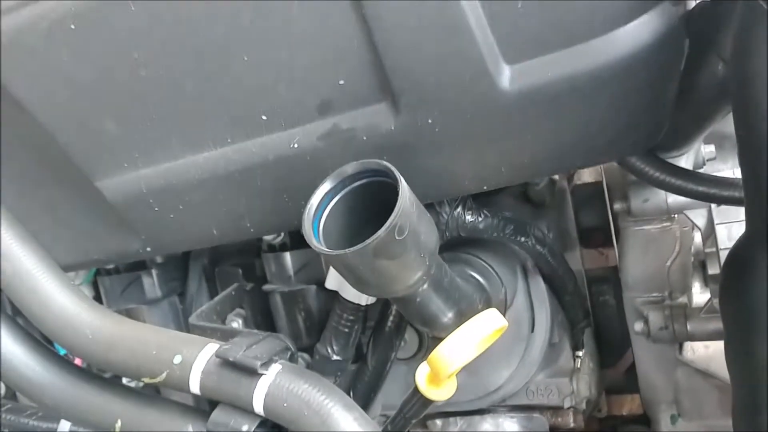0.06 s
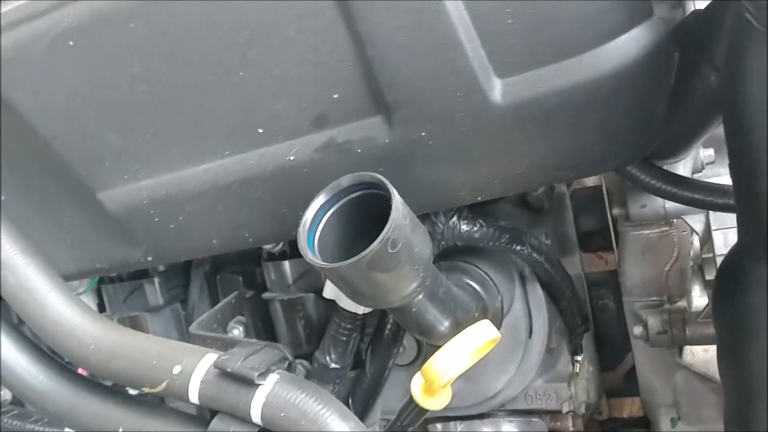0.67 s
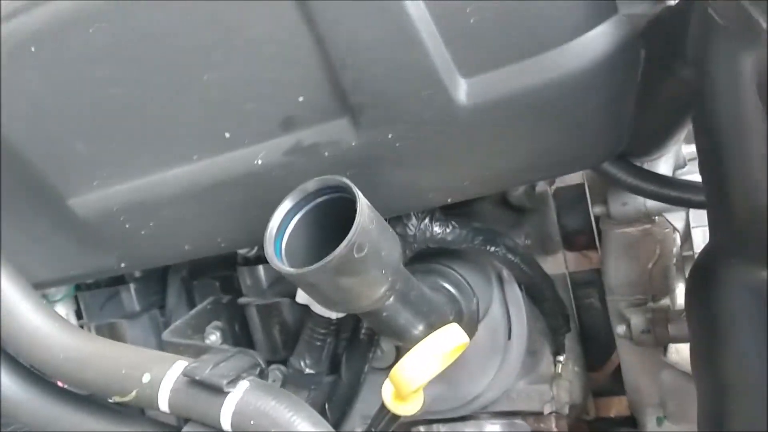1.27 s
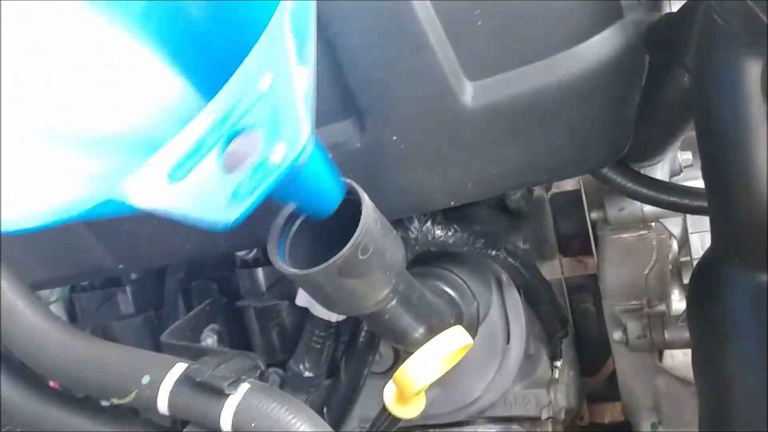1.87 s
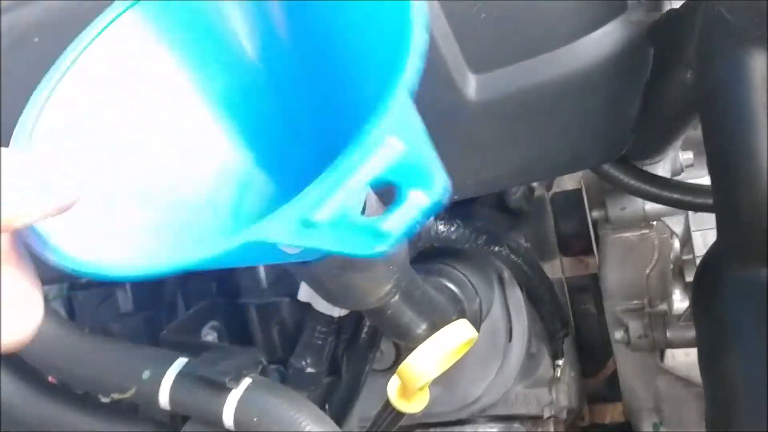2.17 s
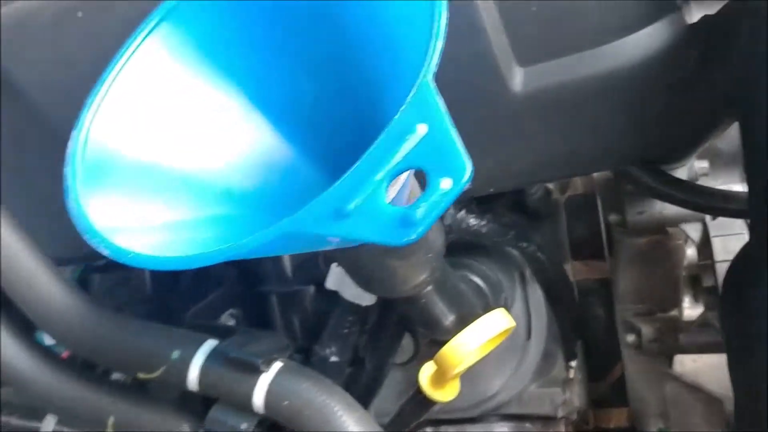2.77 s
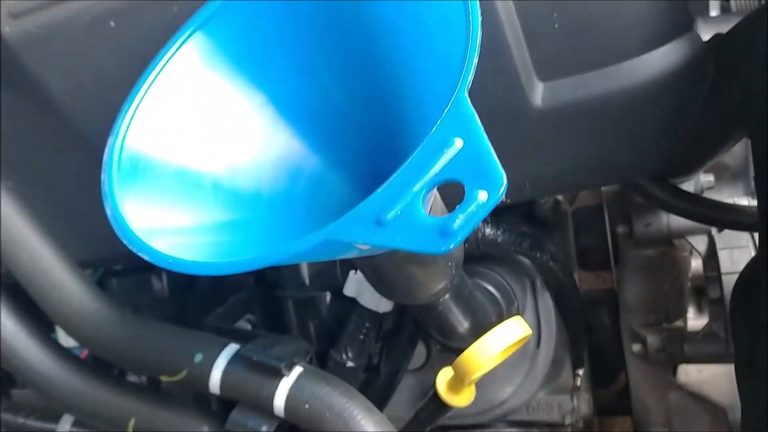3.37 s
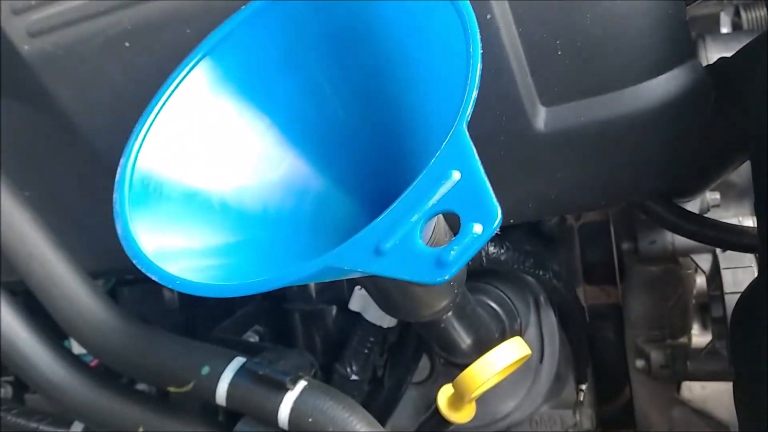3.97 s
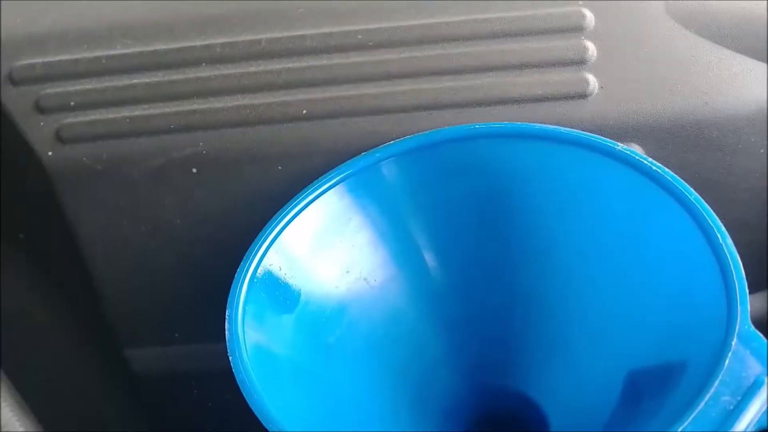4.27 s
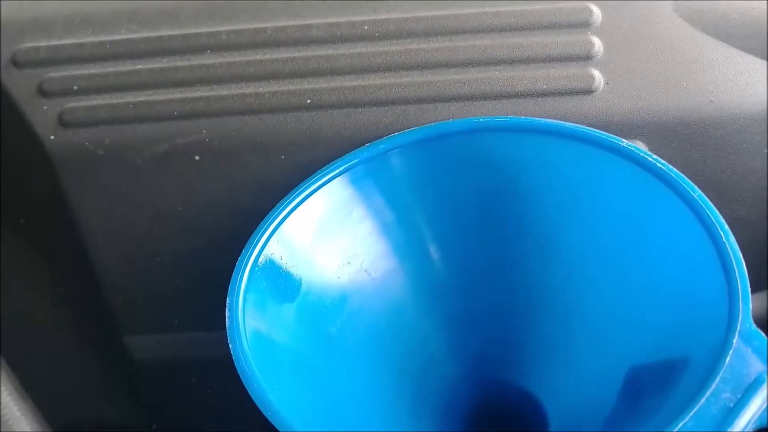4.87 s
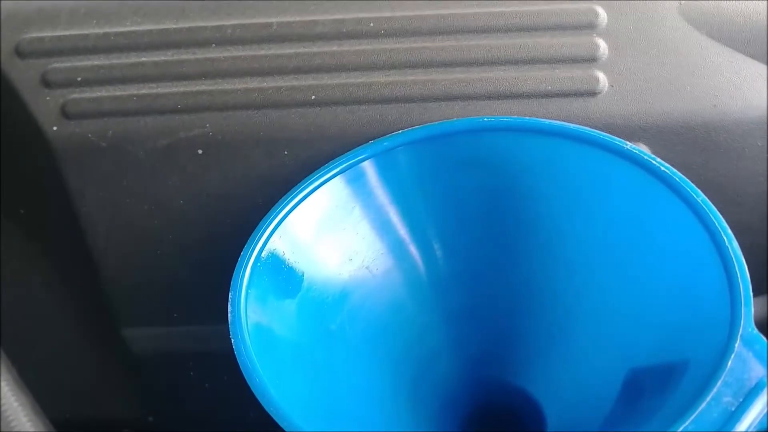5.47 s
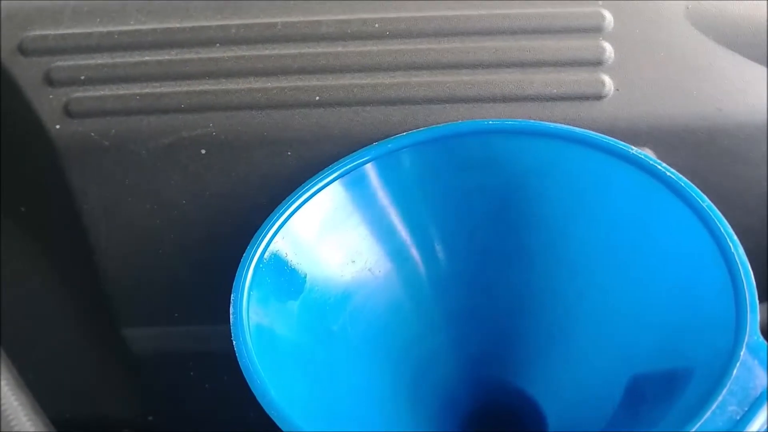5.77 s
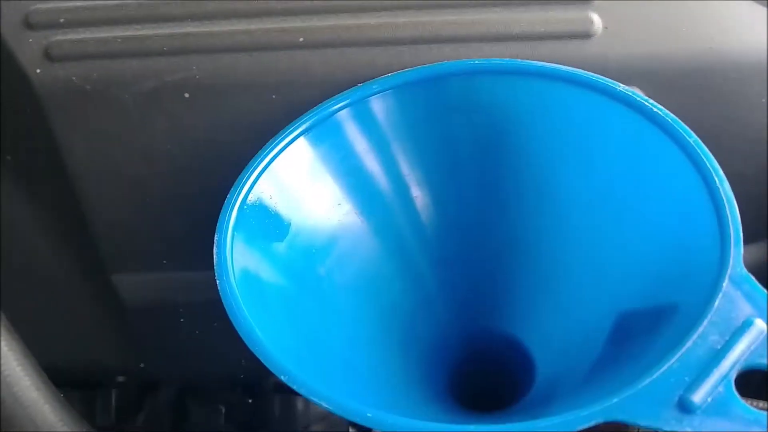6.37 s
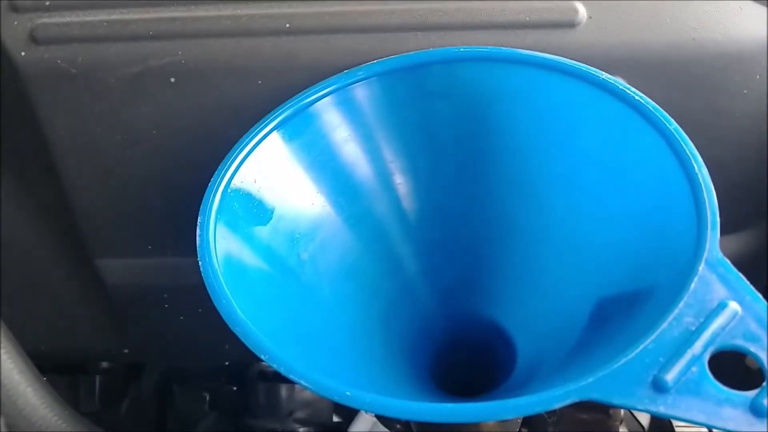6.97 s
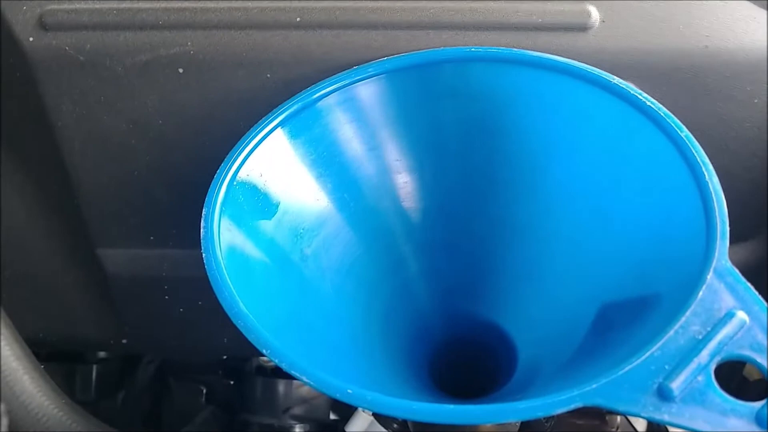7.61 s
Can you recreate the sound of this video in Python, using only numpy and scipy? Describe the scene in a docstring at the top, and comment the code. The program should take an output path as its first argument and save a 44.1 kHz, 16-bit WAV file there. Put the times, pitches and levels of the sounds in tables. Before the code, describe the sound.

A small plastic filler cap clacks and ticks in an open engine bay. A plastic funnel then knocks hollowly and scrapes into the filler neck. After some low hand bumps and a brief dropout, a plastic bottle rubs and creaks quietly, and its liquid gives a few soft glugs. The microphone is hand-held and close, with faint garage hiss underneath.

```python
"""Over faint hiss and hand rumble, a plastic filler cap clacks and ticks in an open engine bay in a garage.
A plastic funnel then knocks and scrapes into the filler neck. After a brief mute at an edit cut, a
plastic bottle rubs and creaks, and its liquid glugs softly. The knocks are damped modes excited by
impact, the scrapes and rubs are stick-slip friction, and the glugs are resonating air pockets.
A hand-held phone close by widens the stereo."""
import sys
import numpy as np
from scipy import signal
from scipy.fft import rfft, irfft, next_fast_len
from scipy.io import wavfile
from scipy.ndimage import uniform_filter1d

SR = 44100
rng = np.random.default_rng(int(sys.argv[2]) if len(sys.argv) > 2 else 0)


def wrap_up_sound(samples):
    """Save the sound to the file named by the first command line argument, as 16-bit audio."""
    columns = np.atleast_2d(samples).T
    # keep every value between -1 and 1, then stretch to whole-number steps
    tamed = np.clip(columns, -1, 1)
    steps = np.round(tamed * 32767).astype(np.int16)
    wavfile.write(sys.argv[1], SR, steps)


N = 341334
TIME = np.arange(N) / SR
# thump, knock, snap and tick registers of an impact: (low edge [Hz], high edge [Hz])
IMPACT_BANDS = [(100, 650), (650, 1800), (1800, 6000), (6000, 16000)]


def undb(db):
    """Decibels to amplitude ratio."""
    return 10 ** (np.asarray(db) / 20)


def unit(x):
    """Normalisation to rms 1."""
    return x / np.sqrt(np.mean(x ** 2))


def curve(table):
    """Gain envelope interpolated through (time [s], level [dB]) points."""
    times, db = np.transpose(table)
    return undb(np.interp(TIME, times, db))


def band(x, lo_hz, hi_hz, order=2):
    """Causal Butterworth band-pass."""
    sos = signal.butter(order, [lo_hz, min(hi_hz, SR / 2 - 1)], "band", fs=SR, output="sos")
    return signal.sosfilt(sos, x)


def add(out, s, sound):
    """Superposition of a short sound at s seconds."""
    i = int(s * SR)
    out[:, i:i + sound.shape[-1]] += sound[..., :N - i]


def coloured(pair, colour):
    """Spectral shaping of two unrelated signals as mid and side; returns left and right at rms 1."""
    hz, *dbs = np.transpose(colour)
    size = next_fast_len(N)
    log_hz = np.log(np.arange(size // 2 + 1) * SR / size + 1)
    gains = [undb(np.interp(log_hz, np.log(hz), db)) for db in dbs]
    mid, side = (irfft(rfft(x, size) * gain, size)[:N] for x, gain in zip(pair, gains))
    return unit(np.array([mid + side, mid - side]))


def wander(rate_hz):
    """Smooth random modulation at rms 1."""
    step = int(SR / rate_hz)
    held = np.repeat(rng.standard_normal(N // step + 1), step)
    return unit(uniform_filter1d(held, step)[:N])


def gestures(rows, attack_s, release_s, level_column=2):
    """Power summation of envelopes: each row swells, holds its level for its duration and dies away."""
    power = np.zeros(N)
    for row in rows:
        early, late = np.maximum(row[0] - TIME, 0), np.maximum(TIME - row[0] - row[1], 0)
        fade = np.exp(-np.minimum(2 * (early / attack_s + late / release_s), 20))
        power += undb(row[level_column]) ** 2 * fade
    return np.sqrt(power)


def slips(rate_hz, spread_db, smooth):
    """Stick-slip: tiny random releases of uneven size over a smooth friction noise."""
    releases = rng.random(N) < rate_hz / SR
    sizes = releases * undb(spread_db * np.minimum(rng.exponential(size=N), 4))
    return unit(unit(sizes * rng.standard_normal((2, N))) + smooth * rng.standard_normal((2, N)))


def contacts(hits, skirt_db, rebound_s, rebound_db, rebound_soft):
    """Contact spectra: each impact and its softer rebound as (time [s], level in each register [dB])."""
    centre_hz, out = np.sqrt(np.prod(IMPACT_BANDS, axis=1)), []
    for s, db, lo_hz, hi_hz in hits:
        for onset, level, top_hz in (s, db, hi_hz), (s + rebound_s, db + rebound_db, hi_hz * rebound_soft):
            # an edge touch moves no lows, a soft contact no highs; both fall by skirt_db an octave
            rolloff = (1 + (lo_hz / centre_hz) ** 2) * (1 + (centre_hz / top_hz) ** 2)
            shape_db = -skirt_db / 2 * np.log2(rolloff)
            out.append((onset, *(level + shape_db - shape_db.max())))
    return out


def impacts(hits, modes, punch, crack_db, crack_t60, crack_hz, bay_db, bay_t60, lag_ms, scatter_rad):
    """Modal response: each impact cracks, rings damped modes and scatters round the engine bay."""
    out, t = np.zeros((2, N)), np.arange(SR // 9) / SR
    hz, db, t60 = np.transpose(modes)[:, :, None]
    t60 = np.minimum(t60, 130 / hz)  # plastic is lossy: 130 cycles at most
    # sound reaches the right port a little later, and each mode by a slightly different path
    age = np.maximum(t - np.array([0, lag_ms / 1000])[:, None, None], 0)
    decay = undb(db - 60 * age / t60) * (age > 0)
    # the first cycles are the strongest, then the hand damps the part
    contact = (1 - np.exp(-t / .0002)) * (1 + punch * np.exp(-(t / .003) ** 2))
    for s, *levels_db in hits:
        detune = 1 + .012 * rng.standard_normal(hz.shape)
        phase = scatter_rad * rng.standard_normal((2, len(hz), 1))
        # firm blows drive the main modes; light touches land anywhere and favour other modes each time
        spot_db = np.interp(max(levels_db), [-38, -26], [6, 1]) * rng.standard_normal(hz.shape)
        ring = (undb(spot_db) * decay * np.sin(2 * np.pi * hz * detune * age + phase)).sum(1)
        crack = undb(crack_db - 60 * t / crack_t60) * band(rng.standard_normal((2, len(t))), 100, crack_hz)
        diffuse = unit(band(rng.standard_normal((2, len(t))), 160, 1400, order=1))
        bay = undb(bay_db - 60 * t / bay_t60) * diffuse
        for level, (lo_hz, hi_hz) in zip(levels_db, IMPACT_BANDS):
            part = band(contact * (ring + crack + bay), lo_hz, hi_hz, order=3)
            attack_rms = np.sqrt(np.mean(part[:, :SR // 90] ** 2))
            add(out, s, undb(level) * part / attack_rms)
    return out


def air():
    """Noise floor: quiet garage air and microphone self-noise with two narrow bright bands."""
    # spectrum of the floor: (frequency [Hz], mid [dB], side [dB])
    spectrum = [(25, -21, -9), (58.6, -1, -15), (126, 0.5, -11), (259, -11, -16.5), (496, -17.5, -22),
                (1000, -23.5, -25), (1630, -27, -26), (2130, -34, -32.5), (4000, -33, -32.5),
                (6100, -32, -33), (7800, -31, -31.5), (10600, -30.5, -30.5), (14900, -33.5, -36)]
    # its slow drift: (time [s], level [dB])
    drift = [(0, -55.5), (.5, -51), (1.1, -56), (1.5, -53), (2.6, -53.5), (3.1, -50), (4, -52),
             (5.65, -49.5), (7.74, -49)]
    sheen = undb(-19.5) * unit(band(rng.standard_normal((2, N)), 7350, 7900))
    top = undb(-17) * unit(band(rng.standard_normal((2, N)), 14500, 15400, order=1))
    return curve(drift) * (coloured(rng.standard_normal((2, N)), spectrum) + sheen + top)


def garage(x):
    """Reverberation: a faint, dull exponential tail that starts with the first wall reflection."""
    t = np.arange(SR // 2) / SR
    tail = band(rng.standard_normal((2, len(t))), 120, 1500) * undb(-60 * t / .4) * (t > .012)
    tail /= np.sqrt(np.sum(tail ** 2) / 2)
    return undb(-35.5) * signal.fftconvolve(x, tail, axes=1)[:, :N]


def handling():
    """Structure-borne sound: the hand rumbles and bumps on the phone, in antiphase at the two ports."""
    # shifts of grip: (start [s], duration [s], relative level [dB])
    shifts = [(.26, .3, -53), (.62, .3, -42.5), (1.85, .55, -58), (2.46, 0.074, -45), (2.78, 0.26, -44),
              (3.36, 0.048, -51), (3.53, 0.45, -45.5)]
    # soft bumps of the hand: (time [s], relative level [dB], frequency [Hz])
    bumps = [(3.574, -17.5, 116), (3.608, -30, 84), (3.737, -16.5, 116), (3.767, -17.5, 135),
             (3.769, -27.5, 260), (3.783, -17, 84.4), (3.927, -21, 105)]
    out, t = np.zeros((2, N)), np.arange(SR // 5) / SR
    grip = undb(-65) + gestures(shifts, attack_s=.025, release_s=.027)
    flutter = undb(4.8 * wander(25))
    out += undb(-1) * grip * flutter * unit(band(rng.standard_normal(N), 45, 135, order=3))
    for s, db, hz in bumps:
        add(out, s, undb(db - 60 * t / .066) * np.sin(2 * np.pi * hz * t) * (1 - np.exp(-t / .0014)))
    return out * np.array([[1.15], [-.65]])


def glugs():
    """Bubble resonance: big air pockets ring low inside the bottle, each with a little splash."""
    # air pockets in the liquid: (time [s], relative level [dB], settled pitch [Hz], t60 [s])
    pockets = [(6.997, -42, 251, 0.08), (7.031, -37, 266, 0.077), (7.074, -43, 245, 0.13),
               (7.12, -42, 325, 0.11), (7.139, -41, 230, 0.11), (7.193, -31, 223, 0.092),
               (7.225, -41, 215.5, 0.19), (7.344, -45, 234, 0.13), (7.377, -49, 122, 0.13)]
    out, t = np.zeros((2, N)), np.arange(SR // 3) / SR
    for s, db, hz, t60 in pockets:
        pitch = hz * (1 + .21 * np.exp(-t / .002))  # the pocket sinks in pitch as it swells
        splash = undb(-14.5) * unit(band(rng.standard_normal((2, len(t))), 300, 890, order=1))
        pocket = np.sin(2 * np.pi * np.cumsum(pitch) / SR) * undb([[4], [7]])
        add(out, s, (pocket + splash) * undb(db - 60 * t / t60) * (1 - np.exp(-t / .0013)))
    return out


def bottle_rubs():
    """Friction through resonators: skin catches and hisses on the bottle, coloured by its air and walls."""
    # strokes of the hands: (start [s], duration [s], relative rub level [dB], relative hiss level [dB])
    strokes = [(4.18, 0.015, -49.5, -73), (4.355, 0.029, -46.5, -58), (4.45, 0.053, -37, -52.5),
               (4.63, .03, -45, -50.5), (4.78, 0.03, -45, -48), (4.85, 0.043, -49.5, -52.5),
               (4.95, 0.095, -47, -61.5), (5.095, .13, -35, -53.5), (5.32, .19, -48, -82),
               (5.80, 0.079, -42, -56.5), (5.945, 0.09, -41, -53), (6.1, 0.73, -51, -65.5),
               (6.375, 0.034, -52, -63), (6.53, 0.075, -40.5, -56), (6.95, 0.28, -50.5, -65.5),
               (7.675, .06, -52, -77)]
    # spectrum of skin on plastic: (frequency [Hz], mid [dB], side [dB])
    spectrum = [(50, -18, -17.5), (152, 5.5, -9.5), (331, -2, -5.5), (545, -5, -11), (824, -7, -7.5),
                (1320, -11.5, -13), (2040, -17, -14.5), (3260, -23, -29), (3960, -24, -22),
                (5400, -23.5, -25.5), (7580, -31.5, -28), (15000, -36, -35.5)]
    # air and wall resonances: (frequency [Hz], bandwidth [Hz], gain [dB])
    resonances = [(382, 166, -0.5), (730, 70, -2.5), (1000, 90, -16), (2920, 640, 2)]
    # the rubbing moves from the right to the middle: (time [s], left minus right [dB])
    pan = [(5.5, -6), (5.8, 0)]
    attack_s, release_s = .041, .039
    friction = coloured(slips(rate_hz=1500, spread_db=-.5, smooth=1), spectrum) * undb(1.33 * wander(70))
    resonant = sum(undb(db) * band(friction, hz - width / 2, hz + width / 2, order=1)
                   for hz, width, db in resonances)
    balance = curve(pan) ** np.array([[.5], [-.5]])
    rubbing = gestures(strokes, attack_s, release_s) * unit(friction + resonant) * balance
    fine_slips = unit(band(slips(rate_hz=5800, spread_db=6, smooth=1), 4000, 16000, order=1))
    hiss = gestures(strokes, attack_s, release_s, level_column=3) * fine_slips
    return undb(-.5) * rubbing + undb(3.5) * hiss


def bottle_creaks():
    """Impulsive excitation: the bottle's wall gives in small steps that ring its modes."""
    # steps of the wall: (time [s], relative level [dB], low corner [Hz], high corner [Hz])
    steps = [(4.245, -47, 110, 860), (4.292, -47.5, 100, 1210), (5.077, -31.5, 100.7, 714),
             (5.792, -36.5, 100.4, 280), (5.84, -35.5, 100, 563), (5.928, -34.5, 100, 1490),
             (5.984, -34.5, 560, 700), (6.002, -31.5, 100, 130), (6.509, -39.5, 100, 2390),
             (6.556, -35.5, 430, 470), (6.5855, -37, 221, 14100), (7.6503, -34, 100, 2000)]
    # modes of the bottle: (frequency [Hz], level [dB], t60 before the loss limit [s])
    modes = [(190, -12.5, 0.35), (279, -2.5, 0.16), (465.3, -8, 0.22), (560, -10, 0.043), (765, -2, 0.05),
             (941, 4.5, 0.089), (1307, -16, 0.097), (2760, -23, 0.019), (3100, -28, 0.0062),
             (5240, -5.5, 0.0055), (7700, -7, 0.022)]
    hits = contacts(steps, skirt_db=6, rebound_s=.012, rebound_db=-5, rebound_soft=.083)
    return undb(-1) * impacts(hits, modes, punch=.29, crack_db=6, crack_t60=.03, crack_hz=11700,
                              bay_db=5.5, bay_t60=.048, lag_ms=.052, scatter_rad=.95)


def scrapes():
    """Stick-slip friction: plastic edges chatter over each other between the knocks."""
    # slides of plastic on plastic: (start [s], duration [s], relative level [dB])
    slides = [(.632, .045, -43), (.805, .03, -44.5), (.85, 0.02, -31.5), (.89, 0.042, -49),
              (1.77, 0.041, -35.5), (1.892, 0.049, -43.5), (2.132, 0.015, -37), (2.215, 0.031, -41.5),
              (2.253, 0.027, -29), (2.30, 0.023, -32), (2.385, 0.065, -50.5)]
    # spectrum of the sliding: (frequency [Hz], mid [dB], side [dB])
    spectrum = [(49.1, -15.5, -12.5), (150, 0.5, -6), (350, 0, -6), (592, -2, -6.5), (900, -11.5, -4),
                (1290, -13, -9.5), (2000, -25, -19.5), (2660, -18.5, -14), (3400, -18.5, -20.5),
                (4500, -21, -19.5), (7000, -29.5, -32), (15070, -34, -33.5)]
    chatter = coloured(slips(rate_hz=1600, spread_db=1.8, smooth=.6), spectrum)
    return undb(-1) * gestures(slides, attack_s=.0073, release_s=.015) * chatter


def funnel():
    """Shell vibration: the thin cone knocks hollowly against the filler neck."""
    # knocks on the neck: (time [s], level [dB], low corner [Hz], high corner [Hz])
    strikes = [(1.7622, -17.5, 290, 410), (1.9205, -31.5, 110.3, 180), (1.941, -37, 110, 260),
               (2.1251, -25, 100, 7000), (2.2542, -36.5, 100, 3670), (2.2651, -20, 99, 4150),
               (2.2803, -33, 600, 4960), (2.3245, -36, 310, 1000), (2.3782, -39.5, 600, 4370),
               (2.4378, -41, 297, 3730), (3.767, -47, 100, 2400)]
    # modes of the cone: (frequency [Hz], level [dB], t60 before the loss limit [s])
    modes = [(197, -15.5, 0.033), (349, 0, 0.049), (449, 9, 0.013), (575, -3, 0.022), (862, 6.5, 0.048),
             (965, 0.5, .045), (1250, -5, 0.074), (1510, -33.5, 0.022), (2640, -7, 0.033),
             (3350, -3.5, 0.029), (3816, -3.5, 0.044), (5000, -19, .02), (6180, -8.5, 0.017)]
    hits = contacts(strikes, skirt_db=10, rebound_s=.014, rebound_db=-13.5, rebound_soft=.22)
    knocks = impacts(hits, modes, punch=.41, crack_db=.5, crack_t60=.031, crack_hz=10600,
                     bay_db=-12.5, bay_t60=.056, lag_ms=.098, scatter_rad=1)
    shade = np.array([[.3], [-.5]])  # its wall shades the right port in the lows
    return knocks + shade * band(knocks, 100, 1500, order=1)


def cap():
    """Damped free vibration: the small hard cap clacks brightly, and the engine cover booms once."""
    # clacks and ticks: (time [s], level [dB], low corner [Hz], high corner [Hz])
    strikes = [(.6263, -40, 140, 8900), (.6586, -34.5, 121, 2220), (.7313, -28.5, 100, 1430),
               (.7703, -19.5, 1640, 2400), (.7985, -39.5, 300, 3000), (.8268, -20.5, 545, 716),
               (.873, -35.5, 100, 6800), (.9727, -22, 4600, 4930), (1.0799, -37, 6050, 7450)]
    # modes of the cap: (frequency [Hz], level [dB], t60 before the loss limit [s])
    modes = [(240, -1.5, 0.035), (520, -13.5, 0.078), (982, 1, 0.034), (1200, -8, 0.028),
             (1503, -12.5, 0.026), (2470, -9.5, 0.025), (2735, -11, .03), (3375, -6, 0.022),
             (3495, 0.5, 0.023), (4020, -5.5, .035), (4750, -9, .028), (5290, -5, 0.02),
             (6030, -15.5, 0.02), (7380, -18.5, 0.015), (8360, -22, .02), (11200, -19.5, .015)]
    hits = contacts(strikes, skirt_db=14, rebound_s=.006, rebound_db=-22.5, rebound_soft=.45)
    out = impacts(hits, modes, punch=.62, crack_db=-7, crack_t60=.022, crack_hz=8000,
                  bay_db=-11.5, bay_t60=.056, lag_ms=.043, scatter_rad=.56)
    boom_s, boom_db, boom_hz, boom_t60 = .83, -31, 152, .36
    t = np.arange(SR // 2) / SR
    add(out, boom_s, undb(boom_db - 60 * t / boom_t60) * np.sin(2 * np.pi * boom_hz * t))
    return out


def scene():
    """Superposition of the direct sounds, their reverberation, the hand and the noise floor."""
    near = cap() + funnel() + scrapes() + bottle_creaks() + bottle_rubs() + glugs()
    return near + garage(near) + handling() + air()


def widen(x, share, lag_ms, corner_hz):
    """Antiphase crossfeed: each channel loses a delayed, dulled copy of the other."""
    size = next_fast_len(N)
    hz = np.arange(size // 2 + 1) * SR / size
    cross = share * np.exp(-2j * np.pi * hz * lag_ms / 1000) / (1 + (hz / corner_hz) ** 4)
    return x - irfft(rfft(x[::-1], size) * cross, size)[:, :N]


def record(dry):
    """Band-limited transmission: the phone widens the stereo and cuts the top."""
    # the sound goes briefly silent at an edit cut: (time [s], gain [dB])
    mute = [(4.031, -1.5), (4.04, -20), (4.065, -48), (4.104, -52), (4.111, -22), (4.158, -21.5),
            (4.17, -4.5)]
    wide = widen(dry, share=.51, lag_ms=.463, corner_hz=5700) * curve(mute)
    low_pass = signal.ellip(10, .2, 70, 15950, fs=SR, output="sos")
    return signal.sosfilt(low_pass, wide)


dry = scene()
out = record(dry)
wrap_up_sound(out)
```